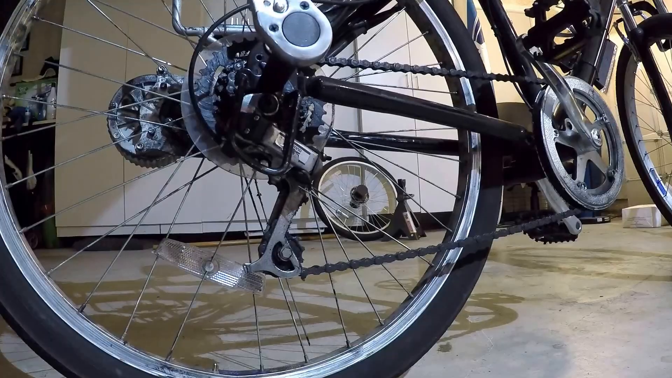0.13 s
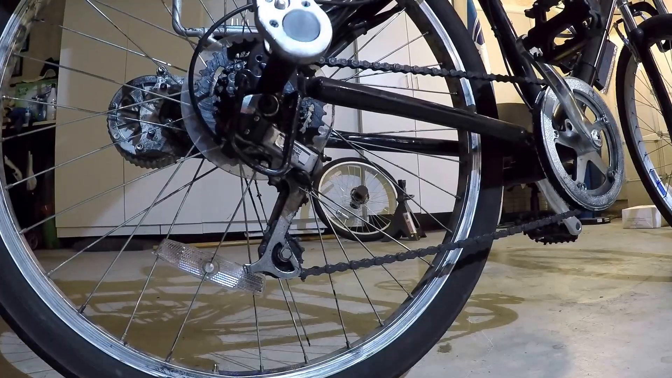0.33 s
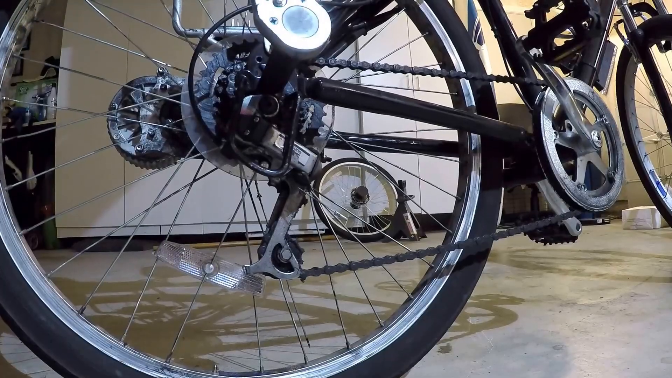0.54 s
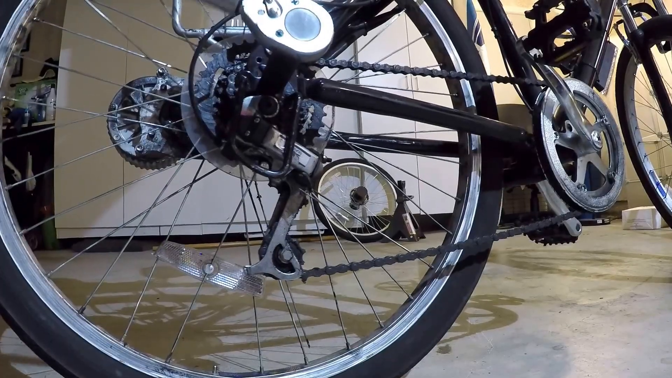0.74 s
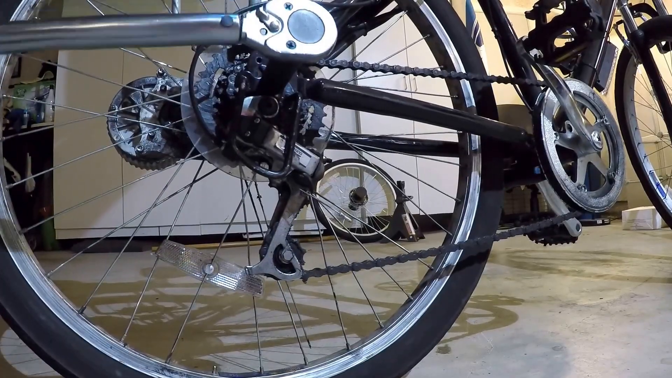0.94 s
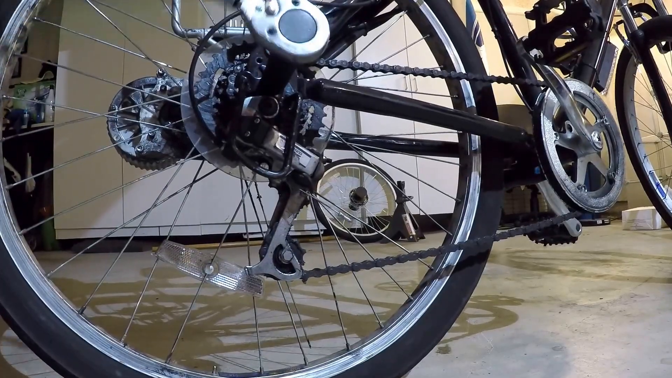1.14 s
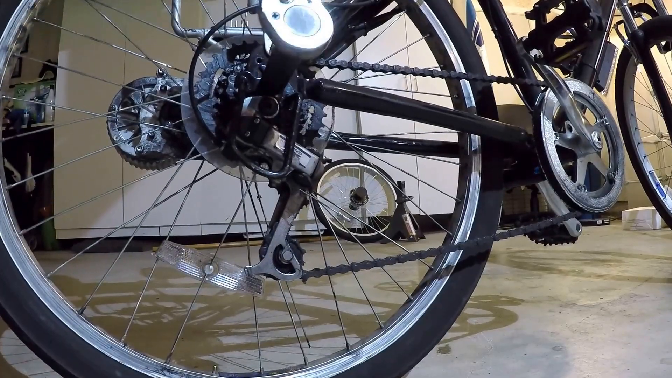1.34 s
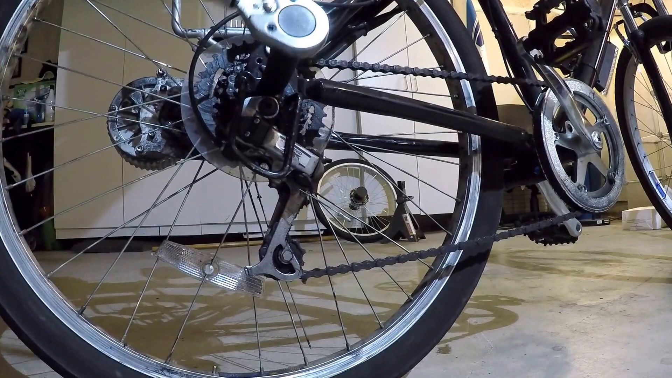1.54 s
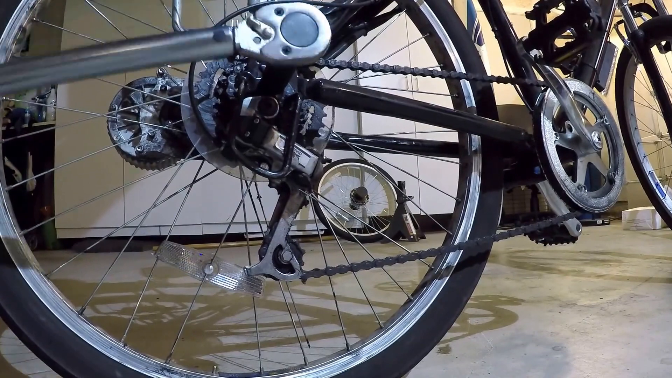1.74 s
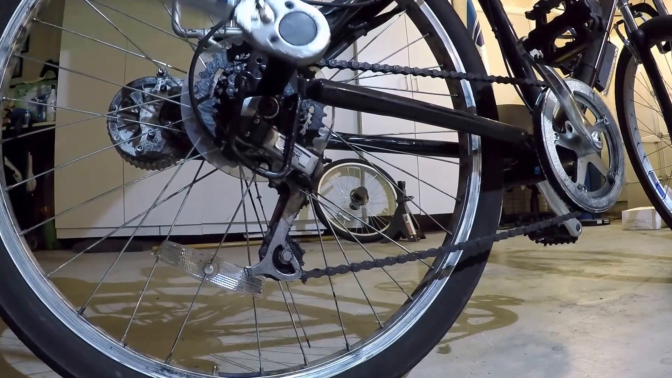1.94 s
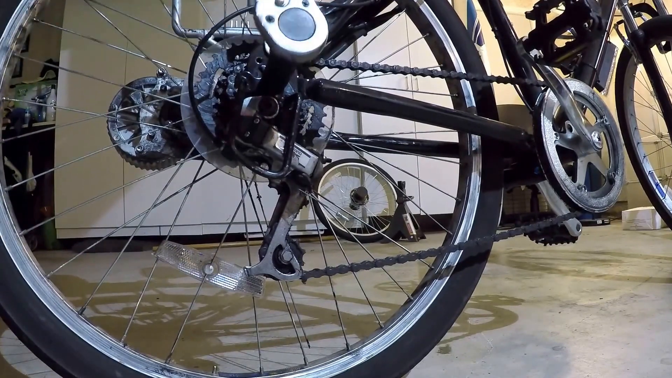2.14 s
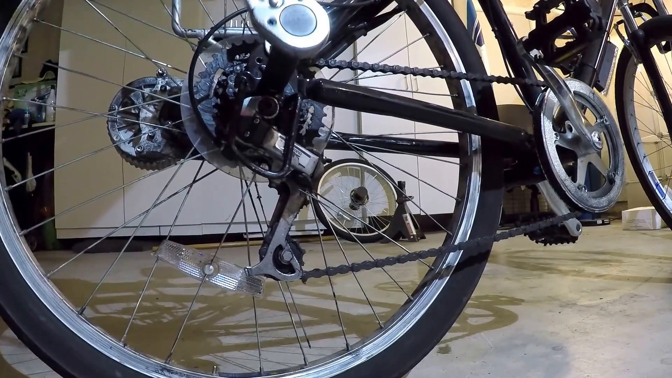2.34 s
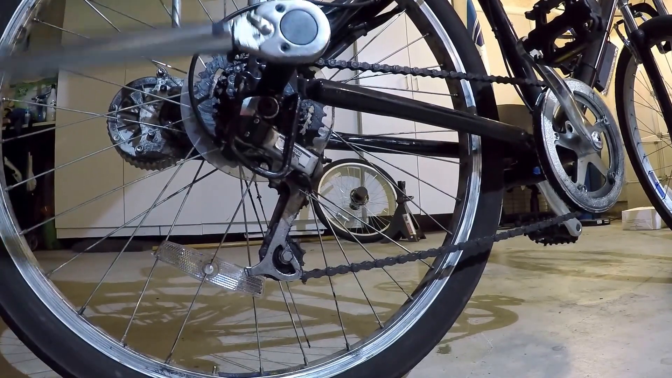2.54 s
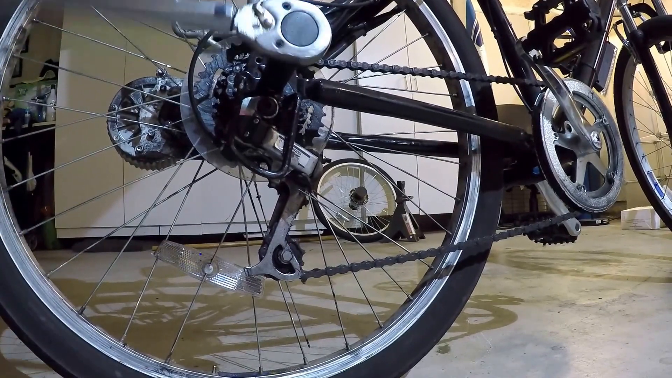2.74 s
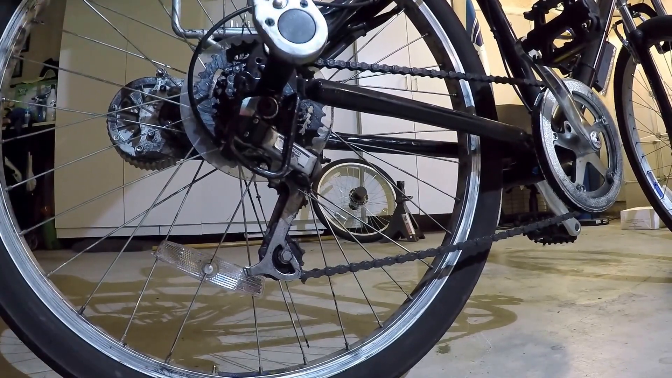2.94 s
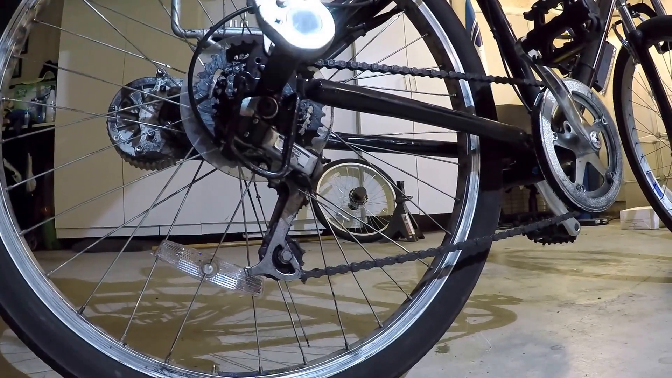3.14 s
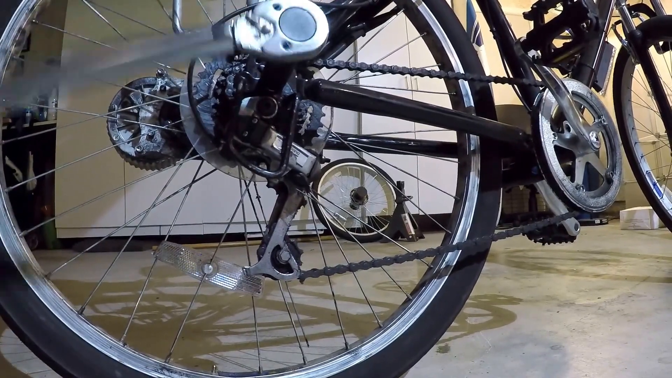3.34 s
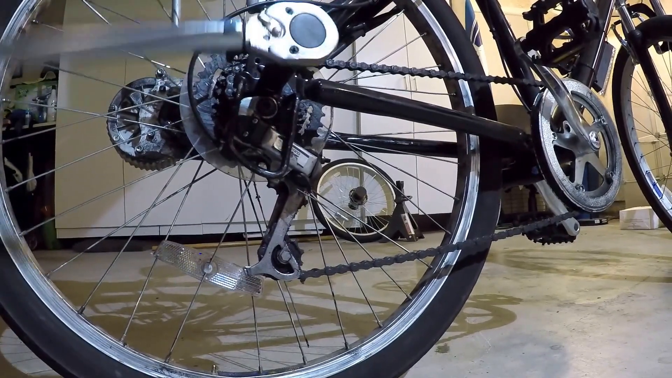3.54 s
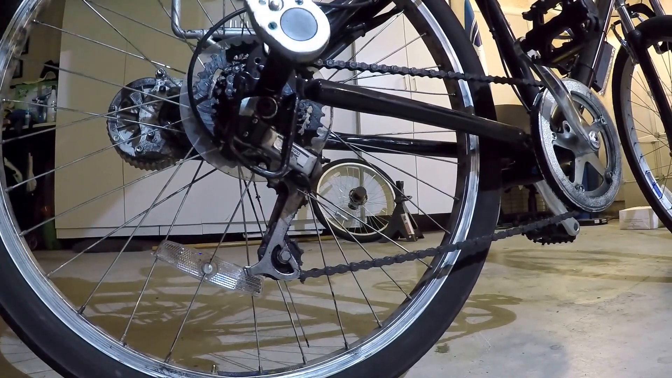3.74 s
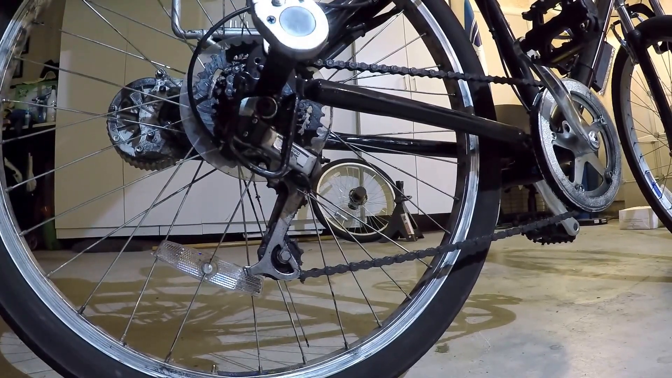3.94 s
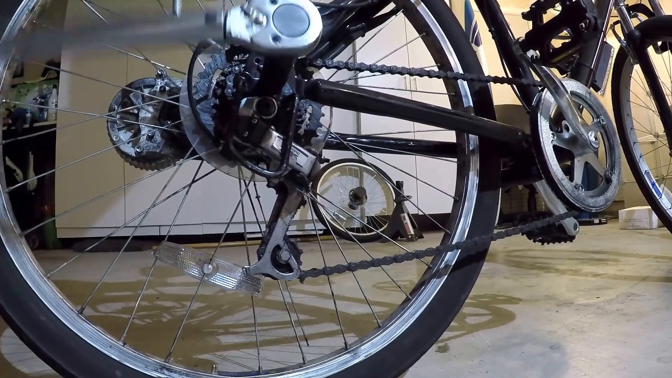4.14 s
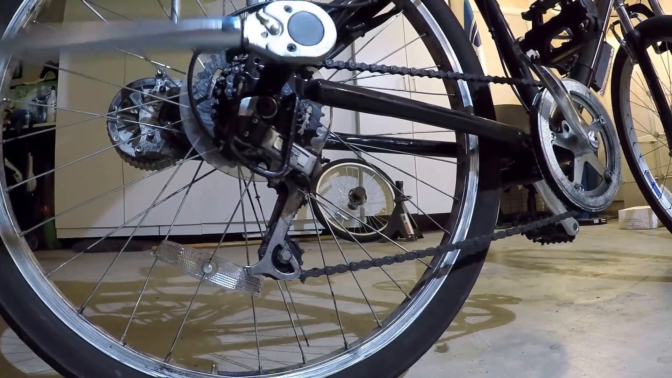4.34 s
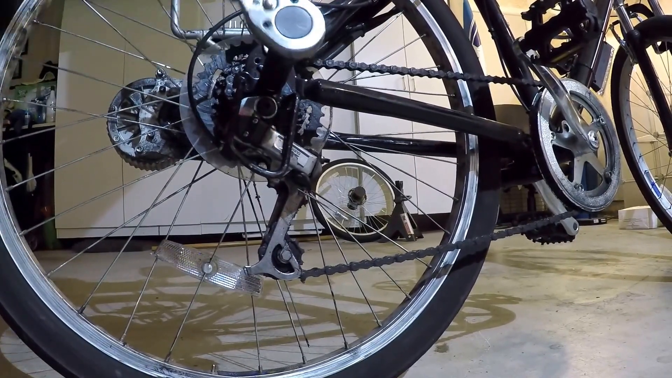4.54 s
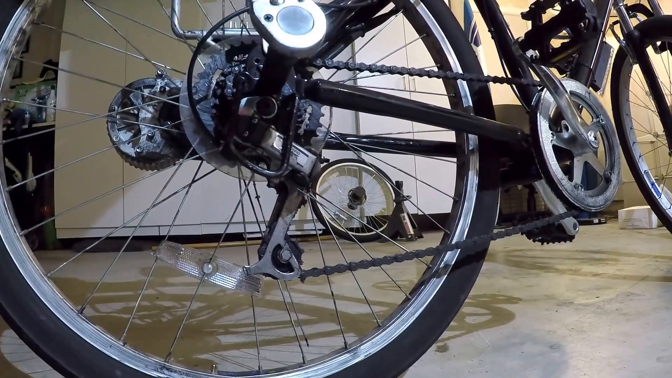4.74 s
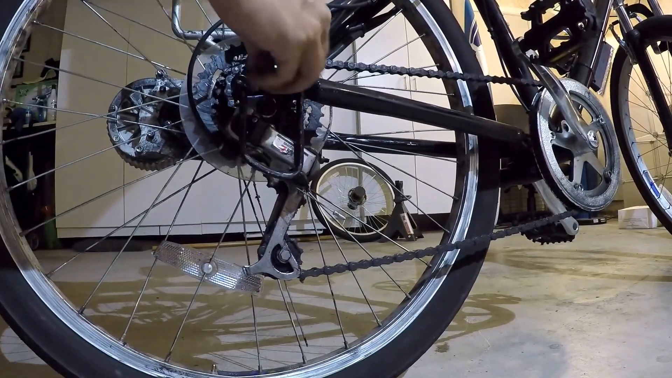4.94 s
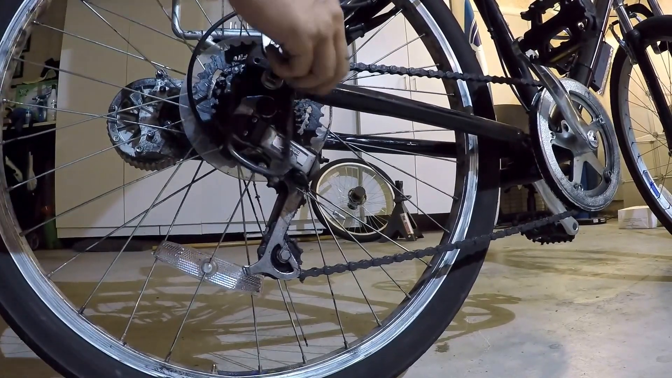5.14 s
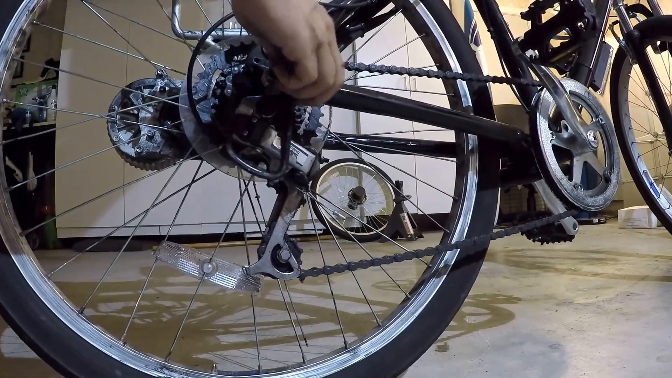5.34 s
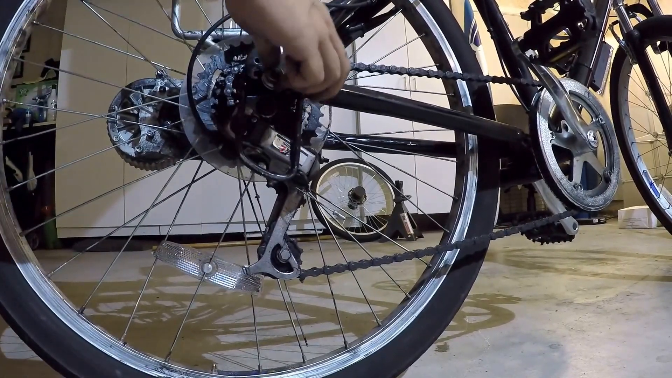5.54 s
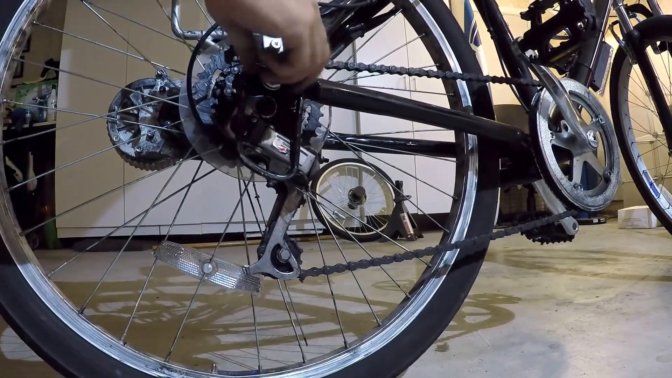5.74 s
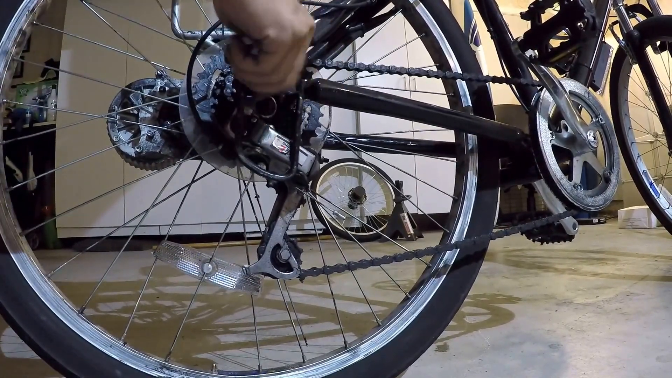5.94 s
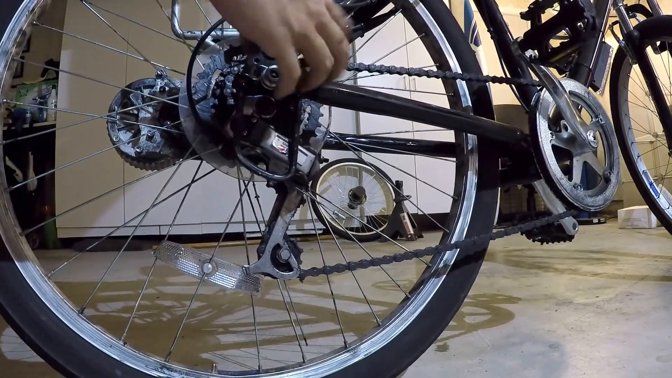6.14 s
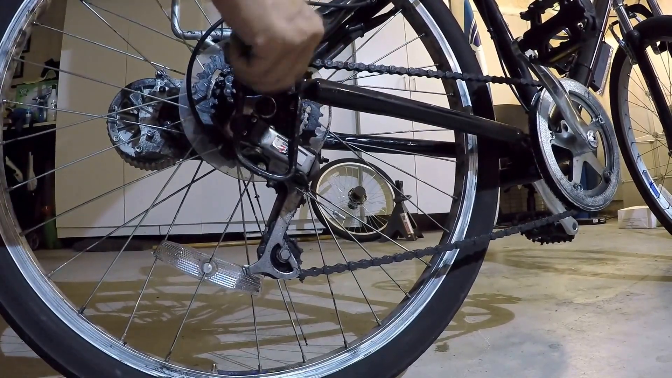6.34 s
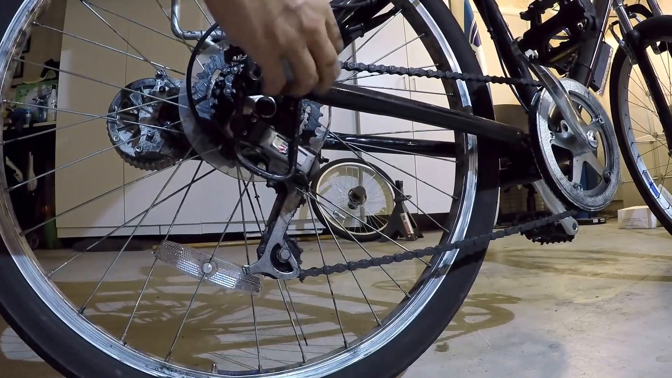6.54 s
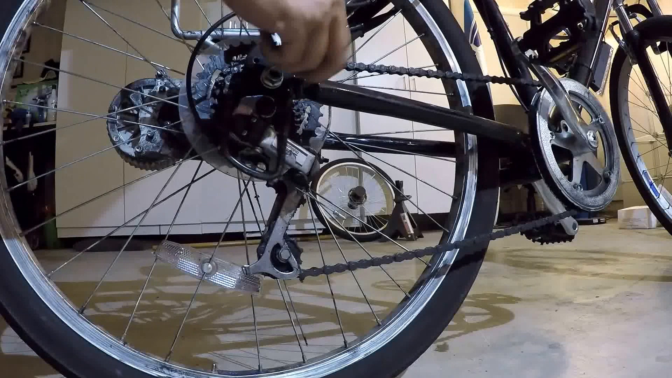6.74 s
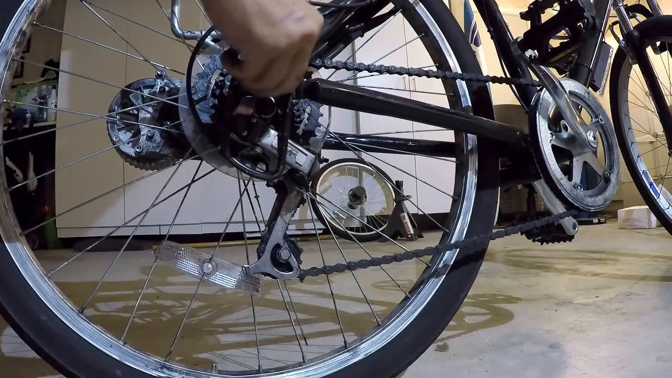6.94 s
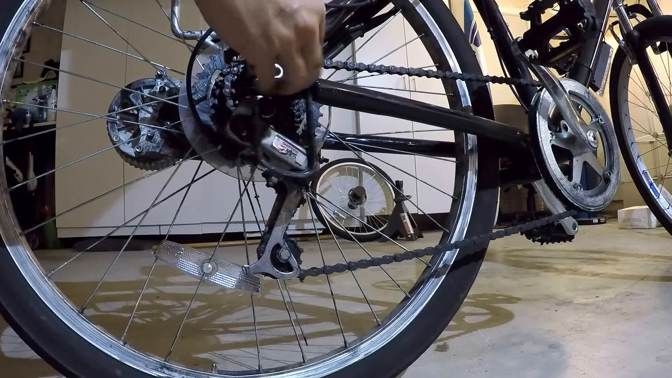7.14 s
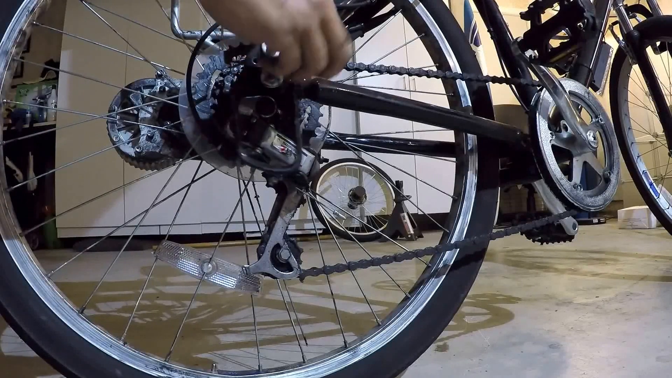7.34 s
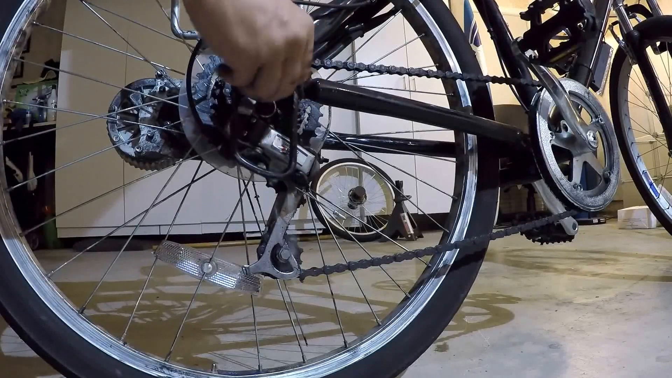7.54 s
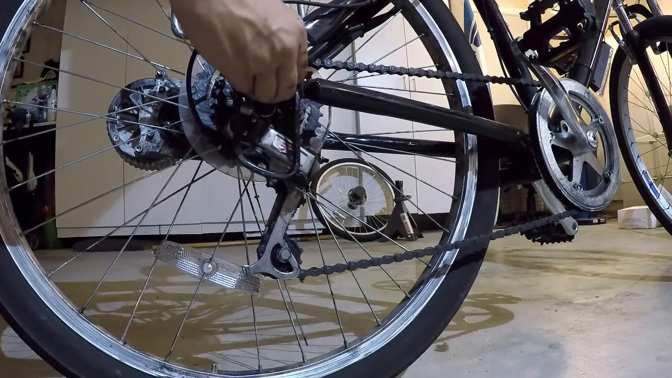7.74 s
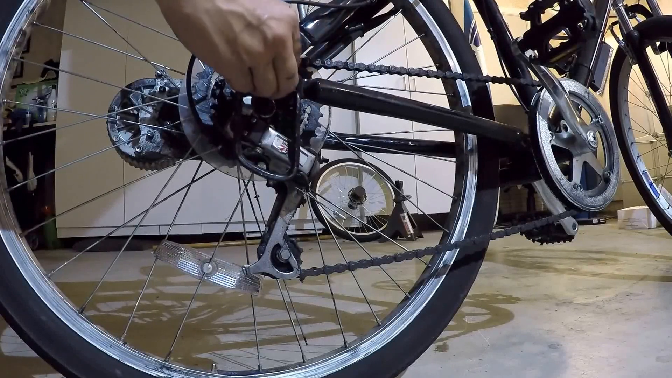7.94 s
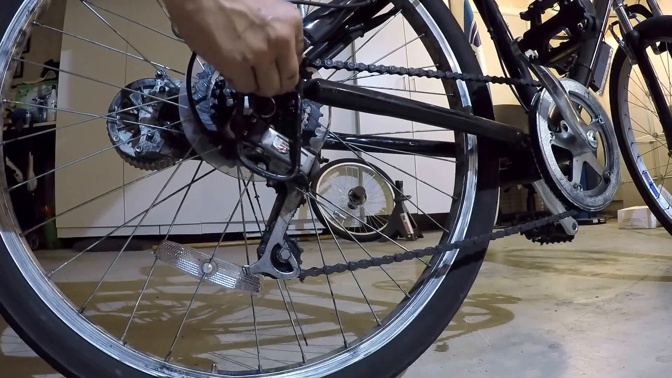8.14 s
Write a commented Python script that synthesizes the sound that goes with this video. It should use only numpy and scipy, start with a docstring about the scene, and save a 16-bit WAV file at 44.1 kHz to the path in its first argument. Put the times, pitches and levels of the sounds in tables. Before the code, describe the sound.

Close up in a workshop with a short, diffuse echo and a quiet low rumble and hum, a ratchet wrench works on a bicycle axle nut. Three slower, sharp metallic clicks come between 0 and 0.3 s, then dull knocks at 0.4-0.5 s. Faster runs of three or four clicks start near 1.1, 1.95, 2.8, 3.6 and 4.4 s, each a crisp, scraping rattle lasting about 0.2 s, with small knocks and hollow socket clacks between. From about 5.1 s a hand handles the hardware: knocks, soft bumps, finger rubs and faint tings. Clearer light tings come at 6.05 and 6.4 s, a strong hollow clack at 6.7 s, a bright steel strike at 7.2 s and a ringing ting near 7.5 s. A hard dry snap at 7.7 s is followed by weaker ones until about 8.1 s, leaving the low hum.

```python
"""Ratchet wrench on a bicycle axle nut

In a workshop, close to the microphone: on each of six back-swings the pawl drops over three or four teeth.
Each drop is a noise burst shaped by the wrench head, with ringing modes and a scrape just ahead of it.
Knocks, clacks and tings of the hardware, bumps, rubs and dry snaps are filtered bursts and decaying modes.
Around them lie early reflections and a room tail; behind them, shaped noise rumbles and a low sine hums."""
import sys
import numpy as np
from scipy import signal
from scipy.fft import rfft, irfft
from scipy.io import wavfile

SR = 44100
rng = np.random.default_rng(int(sys.argv[2]) if len(sys.argv) > 2 else 0)


def to_wav(sig):
    """Store sig (one row per channel, or 1-D mono) as 16-bit WAV at the path in sys.argv[1].

    Samples outside -1..1 are clipped; the rate is SR.
    """
    pcm = np.clip(np.atleast_2d(sig), -1, 1) * 32767
    pcm = np.round(pcm).astype(np.int16)
    wavfile.write(sys.argv[1], SR, pcm.T)  # frames by channels


N = 361619  # length [samples]

HZ = np.fft.rfftfreq(4096, 1 / SR)  # frequency grid of every body [Hz]
BLOW_SAMPLES = .01 * SR  # a blow's level is that of 10 ms with the same energy

# Colour of the wrench head, close up: (frequency [Hz], relative gain [dB])
WRENCH_COLOUR = [(200, -30.5), (520, -31.5), (780, -11.5), (1450, -9.5), (2300, 3), (3200, -3), (4500, 3),
                 (6300, -6), (8200, -4.5), (9700, 0.5), (11700, -6), (13200, -16.5), (14700, -15.5)]
# Ringing modes of the wrench: (frequency [Hz], relative level [dB], t60 [s])
WRENCH_RING = [(1013, 1, 0.028), (1424, 1, 0.044), (2350, 0, 0.015), (2760, -2, 0.025), (4300, -19, 0.016),
               (5100, 1, 0.082), (9870, -10.5, 0.019), (10250, -20, 0.019)]
DROP_T60, CRACK_T60, CRACK_DB = 0.028, 0.0061, -7  # [s], [s], crack relative to the drop [dB]
RING_DB = -15  # wrench ring relative to the drop
LOW_MID_DB, TREBLE_DB, COLOUR_SPREAD_DB = 2.0, -1.73, 1.5  # mean colour, and its chance spread
# The scrape fills the last share of a swing's first-tooth time ahead of each drop
LIFT_SHARE, LIFT_T60, RELEASE_T60 = .09, 0.041, .02  # [share], [s], [s]
# Its level relative to the drop [dB] falls further with the first-tooth time [dB/s]
LIFT_DB, SLOW_LIFT_DB_PER_S, LIFT_TREBLE_DB = -7, 64, 3


def ratchet():
    """The pawl scrapes up a tooth, then slams into the next gap and rings the wrench."""
    out, t = np.zeros(N), np.arange(4096) / SR
    for s, first_tooth_s, db, mid_db in teeth():
        chance_db = COLOUR_SPREAD_DB * rng.standard_normal(2)
        low_db, high_db = np.array([LOW_MID_DB, TREBLE_DB]) + chance_db
        grip_colour = [(1000, low_db), (1600, low_db / 2 + mid_db), (2300, mid_db),
                       (3500, 0), (5500, 0), (9000, high_db)]
        tone = read(WRENCH_COLOUR, HZ) + read(grip_colour, HZ)

        drop = blow(clatter(DROP_T60), 0) + blow(clatter(CRACK_T60), CRACK_DB)
        add(out, s, blow(signal.fftconvolve(drop, body(tone)), db))
        ringing = ring(WRENCH_RING, scatter=3, detune=.05)
        add(out, s, blow(ringing, db + RING_DB))

        # the scrape is brighter, and dies faster once the pawl leaves the tooth
        lead = LIFT_SHARE * first_tooth_s
        scrape = clatter(LIFT_T60) * amp(-60 * np.maximum(t - lead, 0) / RELEASE_T60)
        light = body(tone + read([(1500, -0.37), (9000, LIFT_TREBLE_DB)], HZ))
        scrape_db = db + LIFT_DB - SLOW_LIFT_DB_PER_S * first_tooth_s
        add(out, s - lead, blow(signal.fftconvolve(scrape, light), scrape_db))
    return out


# Back-swings of the handle: (first drop [s], teeth passed, time for the first tooth [s],
# growth of the time from tooth to tooth [s], level [dB], mid colour of the grip [dB])
BACK_SWINGS = [(0.0389, 3, 0.11, 0.013, -20.5, -3.5), (1.1445, 3, 0.059, 0.009, -20.5, 0.5),
               (1.95, 4, 0.061, 0.0073, -20, 0.5), (2.7854, 4, 0.064, 0.003, -20.5, 1),
               (3.6122, 4, .0582, .0048, -20.5, 0), (4.4344, 4, 0.068, -0.0022, -19, -2.5)]


def teeth():
    """The teeth pass at a changing pace: yields time, first-tooth time, level and mid colour per drop."""
    for s, count, first_tooth_s, growth_s, db, mid_db in BACK_SWINGS:
        for k in range(round(count)):
            yield s, first_tooth_s, db, mid_db
            s += first_tooth_s + k * growth_s


# Dull knocks of socket, nut and frame: (time [s], level [dB], t60 [s], brightness [Hz])
DULL_KNOCKS = [(.436, -30.5, 0.021, 3000), (.519, -36.5, 0.026, 6700), (.6355, -49, 0.045, 3800),
               (1.0395, -47.5, .08, 1700), (1.0695, -46, 0.028, 3360), (1.5115, -34, 0.039, 2730),
               (1.8417, -49.5, .049, 1500), (2.4592, -43, 0.022, 7000), (3.3537, -37.5, 0.035, 4220),
               (3.9064, -34.5, 0.024, 11400), (4.0812, -44, 0.03, 2380), (4.1824, -39.5, 0.024, 5700),
               (4.341, -52, .027, 12400), (4.9418, -44, 0.03, 7750), (5.106, -39.5, .027, 6900),
               (5.1241, -30.5, 0.084, 13200), (5.1296, -37.5, 0.096, 5700), (5.221, -42, .059, 9100),
               (5.5808, -40, .038, 3100), (5.7305, -37.5, 0.029, 6670), (6.5748, -39, 0.046, 4400),
               (6.6685, -20.5, 0.16, 4550), (6.6813, -23.5, 0.04, 7200), (6.6864, -22.5, 0.032, 5100),
               (6.7664, -34, 0.062, 2450), (7.114, -38, 0.078, 4030), (7.1521, -32.5, 0.03, 5130),
               (7.307, -36, .095, 9200), (7.3974, -42.5, 0.05, 4400), (7.513, -38, 0.16, 3760),
               (7.578, -40.5, 0.028, 5700), (8.169, -49.5, 0.029, 3600)]


def knocks():
    """Held parts only knock: short blows of steel, with the hollow answer of the frame."""
    out = np.zeros(N)
    for s, db, t60, bright_hz in DULL_KNOCKS:
        add(out, s, knock(db, t60, bright_hz))
    return out


# Hollow clacks of the hand knocking a hollow part: # (time [s], level [dB], t60 of the rattle [s], centre [Hz],
# width [Hz])
HOLLOW_CLACKS = [(.4075, -41.5, 0.022, 840, 250), (2.081, -37, 0.028, 1140, 200),
                 (2.157, -35, 0.027, 1180, 250), (5.2717, -31.5, 0.034, 2180, 2400),
                 (6.673, -40, 0.021, 910, 350), (6.687, -29.5, 0.025, 804, 337),
                 (7.4574, -34.5, 0.045, 1740, 930), (7.512, -34, 0.14, 1710, 1310)]


def clacks():
    """A brief rattle rings one broad resonance of the hollow part."""
    out = np.zeros(N)
    for s, db, t60, hz, width in HOLLOW_CLACKS:
        hollow = body(-10 * np.log10(1 + (2 * (HZ - hz) / width) ** 6))
        add(out, s, blow(signal.fftconvolve(clatter(t60), hollow), db))
    return out


# Small loose steel is struck and rings:
# (time [s], level of the strike before STRIKE_DB [dB], brightness [Hz], level of the ring [dB])
STEEL_TINGS = [(5.393, -42.5, 15300, -41.5), (5.4641, -48.5, 13100, -47.5), (5.5486, -42.5, 6100, -45),
               (6.0476, -32, 4950, -33.5), (6.412, -35.5, 4960, -42.5), (7.1882, -24, 7100, -34),
               (7.321, -37.5, 15000, -43), (7.493, -29, 5160, -29.5), (7.619, -39, 11000, -38.5)]
# Modes of the loose steel, before grip and tilt: (frequency [Hz], relative level [dB], t60 [s])
STEEL_RING = [(4395, -3, .28), (4575, 0, .26), (4605, -5, .15), (6724, -2, .23), (7825, 0, .16),
              (7925, -1, .11), (8037, -4, .12), (9490, -3, .19), (10480, -8, .22), (11865, -7, .2),
              (12690, -9, .15), (13340, -15, .18), (14700, -13, .22)]
STRIKE_T60, STRIKE_DB = 0.049, -1  # [s], [dB]
# Each octave of brightness above EVEN_HZ tilts the ring upwards [dB per octave]
EVEN_HZ, HIGH_DB_PER_OCTAVE = 8400, 9.5


def tings():
    """Loose steel rings on after the blow, higher the harder the contact."""
    out = np.zeros(N)
    for s, db, bright_hz, ring_db in STEEL_TINGS:
        tilt_db = HIGH_DB_PER_OCTAVE * np.log2(bright_hz / EVEN_HZ)
        modes = [(hz, mode_db + tilt_db * np.log2(hz / EVEN_HZ), t60)
                 for hz, mode_db, t60 in gripped(STEEL_RING)]
        add(out, s, knock(db + STRIKE_DB, STRIKE_T60, bright_hz))
        add(out, s, blow(ring(modes, scatter=3, detune=.002), ring_db))
    return out


def gripped(modes):
    """The fingers hold the steel elsewhere each time, and so damp each mode more or less."""
    return [(hz, db, t60 * rng.uniform(.65, 1.2)) for hz, db, t60 in modes]


# Very short dry snaps: (time [s], level [dB])
DRY_SNAPS = [(7.7006, -17), (7.8387, -25), (7.925, -30), (7.988, -41.7), (8.0521, -57), (8.082, -62)]
# Colour of a snap: (frequency [Hz], relative gain [dB])
SNAP_COLOUR = [(200, -27), (700, -11), (1100, -15.5), (2400, -12), (4000, -4.5), (5500, 0.5), (8200, 2),
               (10500, -8), (12000, -13), (15000, -20), (16500, -39)]


def snaps(spread_t60=0.012, spread_db=-3):
    """Something stiff catches and lets go: a single spike with a brief burst around it."""
    out, tone = np.zeros(N), body(read(SNAP_COLOUR, HZ))
    for s, db in DRY_SNAPS:
        spike = blow(clatter(spread_t60), spread_db)
        add(spike, 0, blow(np.ones(1), 0))
        add(out, s, blow(signal.fftconvolve(spike, tone), db))
    return out


# Soft bumps of the hand on the bicycle:
# (time [s], level before bump_db [dB], frame ring before frame_ring_db [dB])
HAND_BUMPS = [(1.05, -44.5, -60), (3.08, -46.5, -54), (5.123, -47, -34.5), (5.183, -50, -41),
              (5.251, -45, -46), (5.395, -44, -42), (5.552, -41.5, -38.5), (6.686, -37, -44),
              (6.769, -43, -42), (7.136, -47, -37), (7.409, -41, -48), (7.51, -51, -38.5), (7.58, -46, -45)]
# Colour of a bump: (frequency [Hz], relative gain [dB])
BUMP_COLOUR = [(60, -14.5), (150, -7), (250, -1.5), (340, 1.5), (440, -13.5), (540, -7.5), (800, -21),
               (1500, -34), (5000, -66)]


def bumps(bump_t60=0.061, bump_db=-1, frame_ring_db=-2):
    """The hand lands with dull bumps that ring the frame."""
    out = np.zeros(N)
    for s, db, frame_db in HAND_BUMPS:
        add(out, s, blow(frame_ring(), frame_db + frame_ring_db))
        thud = signal.fftconvolve(clatter(bump_t60), body(read(BUMP_COLOUR, HZ)))
        add(out, s, blow(thud, db + bump_db))
    return out


# Fingers rubbing on the parts: (time [s], length [s], level [dB], brightness [Hz])
FINGER_RUBS = [(1.019, 0.095, -59.5, 2980), (5.118, 0.17, -53.5, 1970), (5.555, 0.053, -47.5, 1950),
               (6.11, 0.065, -44.5, 6950), (6.463, 0.05, -49, 4960), (7.109, 0.14, -48, 2510),
               (7.378, 0.28, -59, 1970)]


def rubs(slips_per_s=2500):
    """Rubbing is a swarm of tiny slips that swells and fades."""
    out = np.zeros(N)
    for s, length, db, bright_hz in FINGER_RUBS:
        n = int(length * SR)
        slipping = rng.random(n) < slips_per_s / SR
        slips = rng.standard_normal(n) * slipping * signal.windows.tukey(n, .5)
        rub = blow(signal.fftconvolve(slips, contact(bright_hz)), db)
        add(out, s, rub * np.sqrt(n / BLOW_SAMPLES))  # holds the level over the whole length
    return out


def slack_ticks(count=24, tick_db=-58, spread_db=4, tick_t60=0.027, bright_hz=4000):
    """Slack in the held parts gives faint ticks at random moments."""
    out = np.zeros(N)
    for when, size, hardness in rng.random((count, 3)):
        tick = knock(tick_db + spread_db * size, tick_t60, bright_hz * (.5 + 2 * hardness))
        add(out, when * N / SR, tick)
    return out


# The frame rings at FRAME_DB under a blow of USUAL_BLOW_DB, and gains FRAME_GROWTH dB per dB more
FRAME_DB, USUAL_BLOW_DB, FRAME_GROWTH = -49, -37, 0.37


def knock(db, t60, bright_hz):
    """One blow between steel parts; the frame answers with a hollow ring that grows with the blow."""
    out = blow(signal.fftconvolve(clatter(t60), contact(bright_hz)), db)
    frame_db = FRAME_DB + FRAME_GROWTH * (db - USUAL_BLOW_DB)
    add(out, 0, blow(frame_ring(), frame_db))
    return out


# Colour of the parts around the axle: (frequency [Hz], relative gain [dB])
PARTS_COLOUR = [(150, -16), (600, -16.5), (1100, -4.5), (1700, 2.5), (3500, 4), (5400, 6.5), (6200, 0),
                (10000, 2), (15000, -13.5)]


def contact(bright_hz):
    """The softer the contact between the parts, the less treble."""
    return body(read(PARTS_COLOUR, HZ) - 10 * np.log10(1 + (HZ / bright_hz) ** 4))


# Hollow modes of the frame: (frequency [Hz], relative level [dB], t60 [s])
FRAME_MODES = [(255, -7, .08), (360, -8, .06), (510, -8, .04), (720, -2, .035), (805, 0, .045),
               (890, 0, .03), (1030, -3, .035), (1280, -6, .04)]


def frame_ring():
    """The hollow frame rings in its modes, weighted and detuned anew each time."""
    return ring(FRAME_MODES, scatter=3, detune=.03)


def clatter(t60):
    """Countless short-lived modes of steel parts in contact: a dense burst that dies away."""
    t = np.arange(4096) / SR
    return rng.standard_normal(len(t)) * amp(-60 * t / t60)


def ring(modes, scatter, detune=0):
    """Decaying modes; each blow weights them anew by about scatter dB, and the grip detunes by a share."""
    t = np.arange(0, max(t60 for _, _, t60 in modes), 1 / SR)
    out = np.zeros(len(t))
    for hz, db, t60 in modes:
        turns = hz * (1 + detune * rng.uniform(-0.98, 1)) * t + rng.random()
        level_db = db + scatter * rng.standard_normal() - 60 * t / t60
        out += amp(level_db) * np.sin(2 * np.pi * turns)
    return out


# Reflections off the wheel, floor and bench: (delay [s], level [dB])
REFLECTIONS = [(.0043, -25.5), (.0092, -20), (.011, -24), (0.0135, -24)]


def reflections(near):
    """Nearby surfaces return delayed, weaker copies of the near sound."""
    out = np.zeros(N)
    for delay, db in REFLECTIONS:
        add(out, delay, amp(db) * near)
    return out


def room(x, turns_per_s=3.7):
    """The moving tool and hand keep changing the paths of the sound, so two tails take turns."""
    angle = 2 * np.pi * turns_per_s * np.arange(N) / SR
    return sum(signal.oaconvolve(x * share, tail())[:N] for share in (np.cos(angle), np.sin(angle)))


# Decay of the workshop: (frequency [Hz], t60 [s])
WORKSHOP_T60 = [(300, 0.5), (1000, .5), (2600, 0.67), (5000, 0.56), (9000, 0.39), (15000, 0.3)]
# Colour of its tail: (frequency [Hz], level [dB])
WORKSHOP_COLOUR = [(200, 0.5), (1000, -6.5), (2600, -9), (5000, -11), (9000, -12), (15000, -11.5)]


def tail(build_s=0.0055):
    """A diffuse tail that builds up quickly; the treble dies first."""
    hz, t, z = signal.stft(rng.standard_normal(SR), SR, nperseg=256)
    fade = amp(-60 * t / read(WORKSHOP_T60, hz)[:, None])
    fade *= 1 - np.exp(-t / build_s)
    energy = SR * np.mean(fade ** 2, axis=1, keepdims=True)
    fade *= amp(read(WORKSHOP_COLOUR, hz))[:, None] / np.sqrt(energy)
    return signal.istft(z * fade, SR)[1]


# Air noise of the workshop, only its shape: (frequency [Hz], relative density [dB])
AIR_COLOUR = [(15, -11.5), (35, 1), (80, -2), (160, -14.5), (360, -18.5), (560, -25.5), (850, -24),
              (1080, -31), (1290, -21), (1600, -27.5), (2400, -25.5), (3500, -33), (9000, -41),
              (15500, -46)]
AIR_DB = -48  # its rms level
# Low hum: (time [s], pitch [Hz])
HUM_TRACK = [(.45, 81.5), (.7, 60.5), (5, 61), (7.2, 67), (8.2, 63)]
# Its rms level before the waver: (time [s], level [dB])
HUM_LEVELS = [(0, -49), (.7, -57), (1.2, -51.5), (2, -56), (5, -58), (6.8, -76), (7.2, -47.5), (7.8, -48),
              (8.2, -42.5)]


def background(waver_db=2):
    """Steady air noise with a rumble, and a low hum that wavers."""
    t, hz = np.arange(N) / SR, np.fft.rfftfreq(N, 1 / SR)
    air = evened(irfft(rfft(rng.standard_normal(N)) * amp(read(AIR_COLOUR, hz)), N))
    pitch = np.interp(t, *np.transpose(HUM_TRACK))
    db = np.interp(t, *np.transpose(HUM_LEVELS))
    waver = np.interp(t, np.linspace(0, t[-1], 70), rng.standard_normal(70))
    hum = np.sqrt(2) * np.sin(2 * np.pi * np.cumsum(pitch) / SR)
    return amp(AIR_DB) * air + hum * amp(db + waver_db * waver)


def amp(db):
    """Decibels to gain."""
    return 10 ** (np.asarray(db) / 20)


def read(points, hz):
    """A table joined by straight lines on a log-frequency axis."""
    f, value = np.transpose(points)
    return np.interp(np.log(hz + 1), np.log(f + 1), value)


def evened(x):
    """Scales to rms 1."""
    return x / np.sqrt(np.mean(x ** 2) + 1e-20)


def blow(x, db):
    """Gives a short sound the energy of 10 ms at the level db."""
    return x * amp(db) * np.sqrt(BLOW_SAMPLES / (np.sum(x ** 2) + 1e-20))


def add(mix, s, sound):
    """Mixes a sound in at time s."""
    part = mix[max(round(s * SR), 0):][:len(sound)]
    part += sound[:len(part)]


def body(db):
    """Causal, minimum-phase impulse response with the gains db on the grid HZ."""
    log_gain = np.log(amp(np.maximum(db, -100)))
    circle = np.concatenate([log_gain, log_gain[-2:0:-1]])
    return np.fft.ifft(np.exp(np.conj(signal.hilbert(circle)))).real[:len(HZ)]


def scene(wrench_wet_db=-1, hardware_wet_db=1.5, snap_wet_db=-1):
    """Near sources, their first reflections, the room and its background."""
    wrench = ratchet()
    parts = knocks() + tings() + clacks() + rubs() + bumps() + slack_ticks()
    spikes = snaps()
    near = wrench + parts + spikes
    to_room = amp(wrench_wet_db) * wrench + amp(hardware_wet_db) * parts + amp(snap_wet_db) * spikes
    out = near + reflections(near) + room(to_room) + background()
    return out[None]


def record(dry, edge_hz=15600):
    """At the microphone, peaks stop at full scale; then a low-pass limits the band."""
    limited = np.clip(dry, -1, 1)
    low_pass = signal.firwin(255, edge_hz, window=("kaiser", 8), fs=SR)
    return signal.oaconvolve(limited, low_pass[None], "same")


dry = scene()
out = record(dry)
to_wav(out)
```